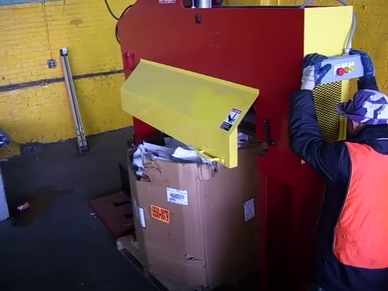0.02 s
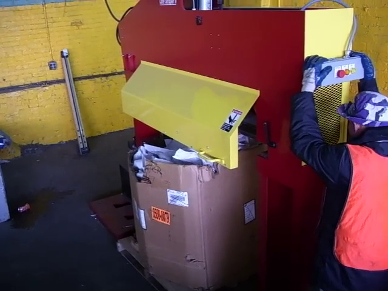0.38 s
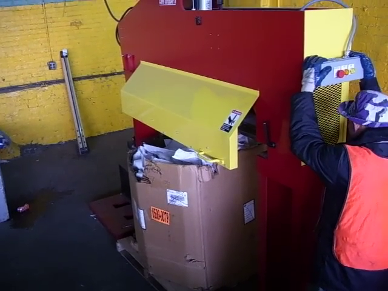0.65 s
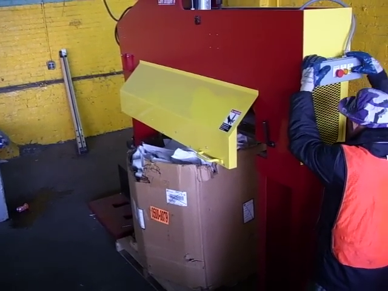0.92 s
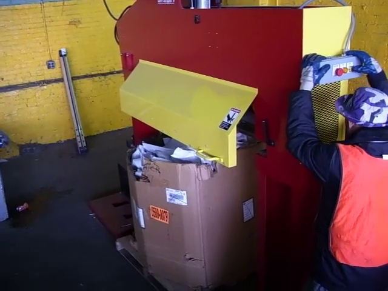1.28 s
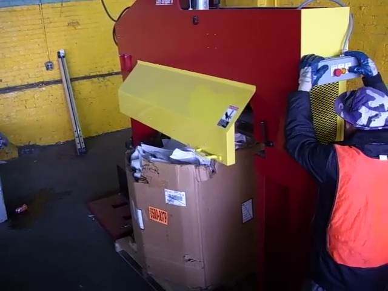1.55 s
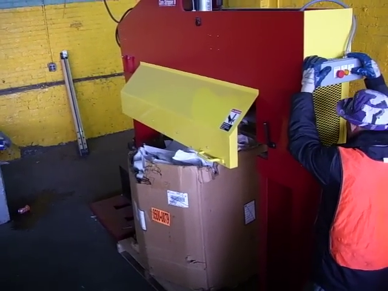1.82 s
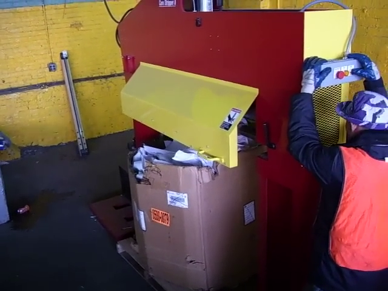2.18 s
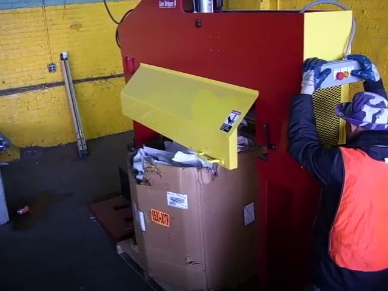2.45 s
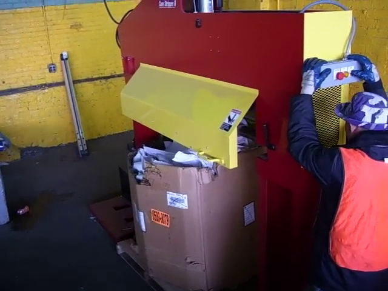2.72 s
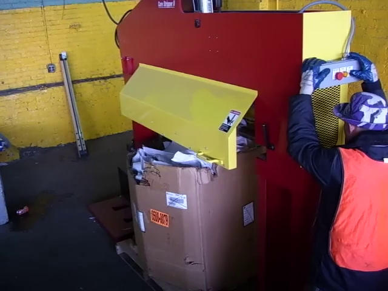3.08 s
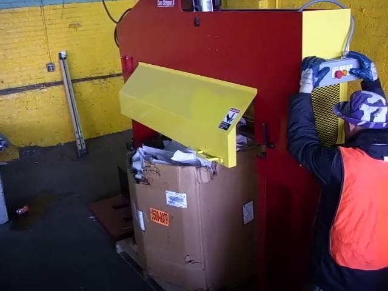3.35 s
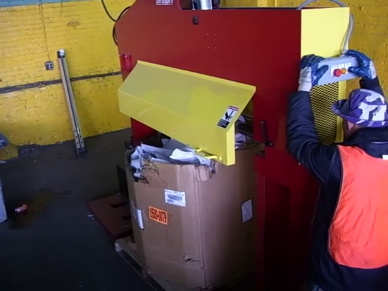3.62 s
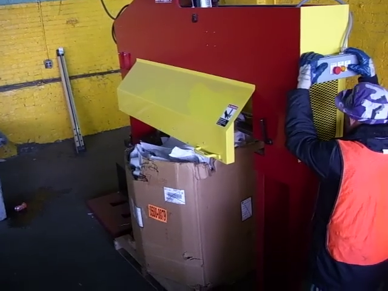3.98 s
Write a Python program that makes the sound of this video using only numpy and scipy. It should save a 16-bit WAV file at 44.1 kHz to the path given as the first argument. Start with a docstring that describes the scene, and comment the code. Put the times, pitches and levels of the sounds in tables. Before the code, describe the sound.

An industrial machine runs in a workshop, its motor humming and whining over a rough rush. Several dull knocks fall in the first second. From about 1.8 seconds it rumbles and gives harsh, ringing metallic rasps, about six a second, which weaken and end near 3.5 seconds. From 3 seconds the hum and buzz grow louder. The sound is narrow, slightly overloading at its loudest.

```python
"""A paper core stripping machine runs in a workshop, its motor humming and whining over a rough rush.
In the first second the work is fed in with a few dull knocks. From 1.8 s the housing rumbles under load
and the cutter catches in evenly paced harsh rasps that ring its blade, the steel frame and a loose panel.
Toward the end its fast strokes settle into a growing buzz.
A narrow-band recorder overloads on the loudest parts."""
import sys
import numpy as np
from scipy.fft import rfft, irfft, next_fast_len
from scipy.io import wavfile
from scipy.ndimage import map_coordinates

SR = 44100
rng = np.random.default_rng(int(sys.argv[2]) if len(sys.argv) > 2 else 0)


def materialize(psi):
    """Save the field psi as 16-bit PCM at rate SR to the path in sys.argv[1].

    A 1-D psi becomes a single channel; in a 2-D psi each row is a channel.
    """
    bounded = np.clip(np.atleast_2d(psi).T, -1, 1)
    quanta = np.round(bounded * 32767).astype(np.int16)
    wavfile.write(sys.argv[1], SR, quanta)


N = 176400
TIME_S = np.arange(N) / SR


def amp(db):
    """Decibels to gain."""
    return 10 ** (np.asarray(db) / 20)


def unit(x):
    """Scale to rms 1."""
    return x / np.sqrt(np.mean(x ** 2) + 1e-20)


def curve(rows, column=1):
    """One column of a time table, per sample."""
    rows = np.asarray(rows)
    return np.interp(TIME_S, rows[:, 0], rows[:, column])


def wobble(rate_hz):
    """Smooth random curve with knots at rate_hz."""
    return map_coordinates(rng.standard_normal(8192), [TIME_S * rate_hz], mode="wrap")


def filtered(x, response):
    """Apply a frequency response."""
    size = next_fast_len(N + 8192)
    return irfft(rfft(x, size) * response(np.fft.rfftfreq(size, 1 / SR)), size)[:N]


def coloured(x, spectrum):
    """Shape x by (freq_hz, gain_db) points on a log axis."""
    freq_hz, gain_db = np.transpose(spectrum)
    return filtered(x, lambda hz: amp(np.interp(np.log(hz + 1), np.log(freq_hz + 1), gain_db)))


def noise(spectrum, grain_db=0):
    """Coloured noise of rms 1; grain_db clumps it into millisecond grains."""
    return unit(coloured(rng.standard_normal(N) * amp(grain_db * wobble(700)), spectrum))


def ringing(modes):
    """Noise through resonances of alternating sign, rms 1."""
    def response(f):
        return sum((-1) ** k * amp(db) * 1j * f * width / (hz * hz - f * f + 1j * f * width)
                   for k, (hz, width, db) in enumerate(modes))
    return unit(filtered(rng.standard_normal(N), response))


def shaft_angle(speed_hz):
    """Integrate speed to radians."""
    return 2 * np.pi * np.cumsum(speed_hz) / SR


def tone(angle, waver_db, smear_rad, rate_hz):
    """Sine of rms 1 with wavering level and phase."""
    gain = amp(waver_db * wobble(rate_hz))
    return unit(gain * np.sin(angle + smear_rad * wobble(rate_hz) + rng.uniform(0, 2 * np.pi)))


def envelope(start_s, rise_s, hold_s, t60_s):
    """Linear rise; exponential decay from hold_s after the start."""
    age_s = TIME_S - start_s
    return np.clip(age_s / rise_s, 0, 1) * amp(-60 * np.maximum(age_s - hold_s, 0) / t60_s)


# Cutter catches: start_s, scrape_db, frame_db, panel_db, hold_s, scrape_t60_s
CATCHES = [(1.796, -6.5, -10.5, -23.5, .04, .4), (1.952, -6, -12.5, -34, 0.026, .4),
           (2.107, -6, -11, -24, .05, 0.025), (2.267, -9, -14, -26, 0.0061, .3),
           (2.424, -10.5, -16.5, -22.5, 0.012, .33), (2.584, -13.5, -18.5, -25.5, .024, .36),
           (2.736, -14.5, -25.5, -24, 0.013, .36), (3.052, -17, -16.5, -28, .015, .2),
           (3.21, -14.5, -26.5, -28, 0.024, .2), (3.366, -17.5, -19.5, -21, 0.032, .25)]
# Scrape spectrum: freq_hz, gain_db
SCRAPE_SPECTRUM = [(20, -23.5), (150, -15.5), (300, -12.5), (550, 2.5), (850, -14), (1100, -7), (2000, -6),
                   (2900, -5), (3500, -3.5), (4200, 0.5), (6000, -9.5)]
# Blade resonances: freq_hz, width_hz, gain_db
BLADE_MODES = [(1907, 7.7, -5), (2031, 41, -1.5), (2471, 25, 0.5), (2497, 33, -0.5), (2640, 25, 0.5),
               (2776, 20, -0.5), (2860, 23, 2), (3076, 50, 0.5), (3332, 17, -1), (3650, 60, 2.5)]
# Steel frame resonances: freq_hz, width_hz, gain_db
FRAME_MODES = [(267.8, 6.9, 4), (344, 17, -2.5), (693.4, 25, 5), (864, 37, -5.5), (932.5, 29, 2.5),
               (1340, 27, 0), (1681, 6.7, -0.5)]
def rasps(panel_hz=407.8, grit_db=-2, blade_db=-4.5, repeat_share=0.67):
    """Each catch scrapes and rings the blade; the frame and a loose panel build up and ring on."""
    repeated, fresh = (noise(SCRAPE_SPECTRUM, grain_db=3.5) for _ in range(2))
    frame, blade = ringing(FRAME_MODES), ringing(BLADE_MODES)
    panel = tone(2 * np.pi * panel_hz * TIME_S, waver_db=0.87, smear_rad=0.5, rate_hz=25)
    out = np.zeros(N)
    for start_s, scrape_db, frame_db, panel_db, hold_s, t60_s in CATCHES:
        aligned = np.roll(repeated, round(start_s * SR))  # same at every catch
        grit = np.sqrt(repeat_share) * aligned + np.sqrt(1 - repeat_share) * fresh
        scrape = amp(scrape_db) * (amp(grit_db) * grit + amp(blade_db) * blade)
        body = amp(frame_db) * frame + amp(panel_db) * panel
        out += scrape * envelope(start_s, rise_s=0.011, hold_s=hold_s, t60_s=t60_s)
        out += body * envelope(start_s, rise_s=0.02, hold_s=hold_s, t60_s=1.97 * t60_s)
    return out


# Shaft speed, sagging under load: time_s, speed_hz
SHAFT_SPEED = [(0, 64.35), (1.0, 64.4), (1.6, 64.3), (2.6, 64.25), (3.1, 64.05), (4, 64.15)]
# Hum partials: shaft_order, gain_db
HUM_PARTIALS = [(2, -25.5), (3, -23), (4, -3.5), (5, -6), (6, -8), (7, -2), (8, -1), (9, -14), (10, -7),
                (11, -13), (12, -11.5), (14, -6.5), (17, -1.5), (18, -7.5), (36, -7), (55, -10)]
# Hum envelope: time_s, level_db
HUM_ENVELOPE = [(0, -48), (.8, -38), (1.05, -35), (1.4, -33.5), (2.6, -32.5), (3.1, -29.5), (4, -26)]
# Whine envelopes: time_s, order_24_db, order_48_db
WHINE_ENVELOPES = [(0, -34.5, -34), (.13, -40, -39), (.27, -29, -29.5), (.45, -41, -40.5),
                   (.64, -29.5, -32), (.74, -42.5, -40), (.85, -26.5, -29), (1.04, -25.5, -40.5),
                   (1.26, -33.5, -28.5), (1.45, -31.5, -45.5), (1.6, -32.5, -23), (1.75, -31.5, -53.5),
                   (2.0, -27, -31), (2.38, -35.5, -32), (2.6, -38, -33.5), (2.85, -31.5, -41.5),
                   (3.17, -24.5, -23.5), (3.38, -21.5, -35.5), (3.68, -32.5, -30.5), (3.95, -23.5, -26)]
# Mechanical rush spectrum: freq_hz, gain_db
RUSH_SPECTRUM = [(20, -30.5), (100, -24), (210, -16), (270, -6.5), (550, -2.5), (820, 0), (1020, -3),
                 (1550, -1.5), (1850, -8), (3200, -7.5), (4200, -8), (6000, -32.5)]
# Rush envelope: time_s, level_db
RUSH_ENVELOPE = [(0, -27.5), (.2, -26), (.45, -26.5), (.85, -25), (.95, -21.5), (1.13, -25.5), (1.38, -20),
                 (1.5, -23.5), (1.76, -18), (2.05, -15), (2.22, -20), (2.55, -25), (2.9, -18.5),
                 (3.25, -15), (3.7, -15), (3.95, -12)]
def motor():
    """One shaft drives hum, whine and a rush that throbs once a turn."""
    angle = shaft_angle(curve(SHAFT_SPEED) + 0.06 * wobble(7))
    hum = sum(amp(db) * tone(order * angle, waver_db=2, smear_rad=0.15, rate_hz=7)
              for order, db in HUM_PARTIALS)
    whine = np.zeros(N)
    for column, order in enumerate((24, 48), start=1):
        partial = tone(order * angle, waver_db=3.57, smear_rad=0.13, rate_hz=30)
        whine += amp(curve(WHINE_ENVELOPES, column)) * partial
    throb = 1 + 0.081 * np.cos(angle)
    rush = unit(noise(RUSH_SPECTRUM, grain_db=2.37) * throb)
    rush_db = curve(RUSH_ENVELOPE) + 0.84 * wobble(25)
    return amp(curve(HUM_ENVELOPE)) * hum + whine + amp(rush_db) * rush


# Cutter buzz partials: stroke_order, gain_db
BUZZ_PARTIALS = [(7, -13.5), (12, -1.5), (13, -1), (14, 2.5), (16, -10), (23, -13)]
# Buzz envelope: time_s, level_db
BUZZ_ENVELOPE = [(0, -45.5), (1.55, -35.5), (1.85, -24.5), (2.3, -31.5), (2.8, -26), (3.3, -24), (4, -20.5)]
def cutter_buzz(stroke_hz=59, chatter_db=-1.5):
    """Fast strokes give a stack of harmonics and a puff of tearing noise each."""
    angle = shaft_angle(stroke_hz + 0.037 * wobble(5.14))
    tones = sum(amp(db) * tone(order * angle, waver_db=0.8, smear_rad=0.073, rate_hz=12)
                for order, db in BUZZ_PARTIALS)
    puffs = np.exp(0.45 * np.cos(angle))
    chatter = unit(noise(RUSH_SPECTRUM) * puffs)
    return amp(curve(BUZZ_ENVELOPE)) * (tones + amp(chatter_db) * chatter)


# Knocks of the work: start_s, tail_db
FEED_KNOCKS = [(.142, -21.5), (0.505, -20.5), (0.516, -24), (.603, -26.5), (0.625, -23.5), (.685, -27),
               (.72, -19.5), (.737, -24), (.889, -20), (0.983, -26), (1.04, -29)]
# Knock spectrum: freq_hz, gain_db
KNOCK_SPECTRUM = [(20, -60), (160, -32.5), (300, -19.5), (480, -5.5), (750, 7), (1200, -1), (1900, -15),
                  (3300, -15), (6000, -32)]
def knocks(crack_boost_db=2, crack_t60_s=0.0066, tail_t60_s=0.31):
    """Dull blows as the work is fed in: a short crack and the workshop's tail."""
    power = np.zeros(N)
    for start_s, tail_db in FEED_KNOCKS:
        age_s = np.maximum(TIME_S - start_s, 0)
        crack = amp(tail_db + crack_boost_db - 60 * age_s / crack_t60_s)
        tail = amp(tail_db - 60 * age_s / tail_t60_s)
        power += (age_s > 0) * (crack ** 2 + tail ** 2)
    return np.sqrt(power) * noise(KNOCK_SPECTRUM, grain_db=3)


# Singing machine parts: start_s, length_s, pitch_hz, level_db
PART_TONES = [(.05, 1.4, 683.2, -32), (.5, 1.5, 836.3, -32.5), (1.31, 0.16, 1095, -25),
              (2.212, .75, 1162, -31), (3.74, .3, 1108, -22), (3.76, .28, 1127, -29)]
def singing_parts():
    """Single tones swell and fade as the load shifts."""
    out = np.zeros(N)
    for start_s, length_s, pitch_hz, level_db in PART_TONES:
        progress = np.clip((TIME_S - start_s) / length_s, 0, 1)
        swell = np.sqrt(np.abs(np.sin(np.pi * progress)))
        note = tone(2 * np.pi * pitch_hz * TIME_S, waver_db=1.4, smear_rad=0.12, rate_hz=10)
        out += amp(level_db) * swell * note
    return out


# Housing rumble envelope: time_s, level_db
RUMBLE_ENVELOPE = [(0, -64), (.85, -54), (.91, -35), (1.0, -43.5), (1.12, -45), (1.55, -50), (1.67, -35.5),
                   (1.78, -34.5), (1.86, -26), (2.14, -33.5), (2.25, -43.5), (2.9, -42), (3.75, -41),
                   (3.97, -33.5)]
# Rumble spectrum: freq_hz, gain_db
RUMBLE_SPECTRUM = [(20, -6), (60, -11.5), (100, -1), (170, 6.5), (300, -4), (700, -29.5), (2000, -77)]
def housing_rumble():
    """The housing rumbles when the load comes on."""
    return amp(curve(RUMBLE_ENVELOPE)) * noise(RUMBLE_SPECTRUM)


# Overall level dips: centre_s, width_s, depth_db
LEVEL_DIPS = [(0.136, 0.039, 2), (0.712, .022, 4), (1.536, 0.048, 8.5), (2.582, 0.013, 5),
              (3.662, 0.024, 4)]
def scene():
    """The whole machine, mono; its level dips briefly a few times."""
    machine = motor() + singing_parts() + housing_rumble() + cutter_buzz() + rasps() + knocks()
    dip_db = sum(depth_db * np.exp(-(2 * (TIME_S - centre_s) / width_s) ** 4)
                 for centre_s, width_s, depth_db in LEVEL_DIPS)
    return (machine * amp(-dip_db))[None]


# Recorder pass band: freq_hz, gain_db
RECORDER_BAND = [(3300, 0.5), (3650, -7.5), (4000, -16.5), (4300, -25), (4600, -40.5), (4900, -72.5)]
def record(dry, saturation=0.65, knee=9.2, ceiling=0.73, cutoff_hz=15900):
    """Input saturation, narrow pass band, clipping of overshoots, final low-pass."""
    saturated = dry[0] / (1 + np.abs(dry[0] / saturation) ** knee) ** (1 / knee)
    clipped = np.clip(coloured(saturated, RECORDER_BAND), -ceiling, ceiling)
    return filtered(clipped, lambda hz: hz < cutoff_hz)[None]


dry = scene()
out = record(dry)
materialize(out)
```